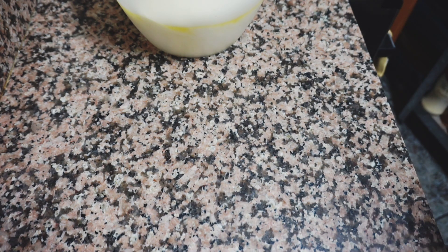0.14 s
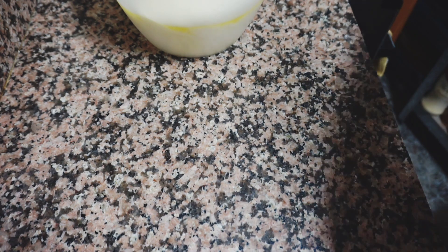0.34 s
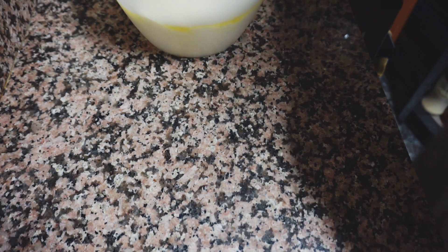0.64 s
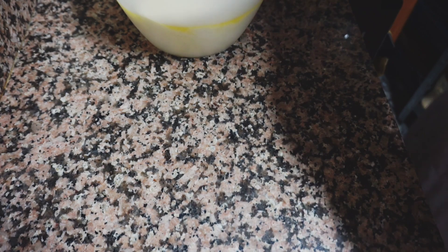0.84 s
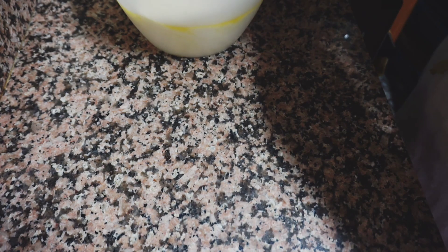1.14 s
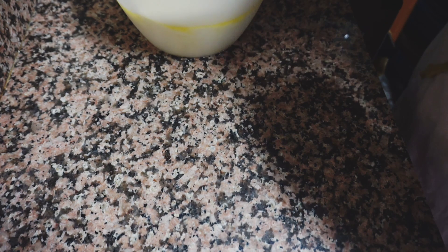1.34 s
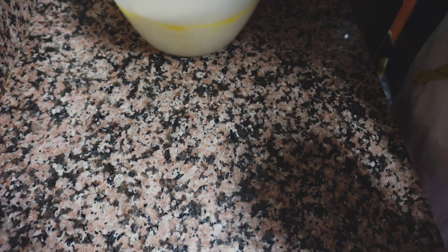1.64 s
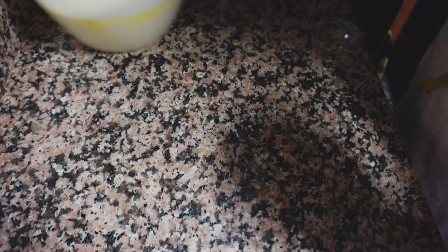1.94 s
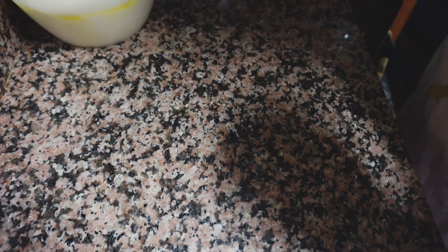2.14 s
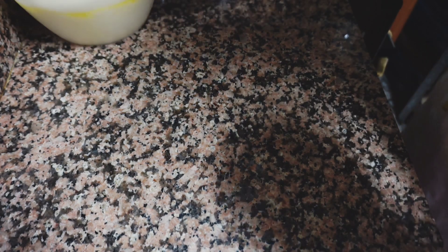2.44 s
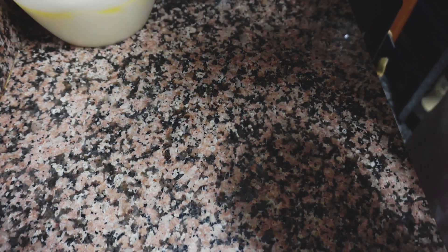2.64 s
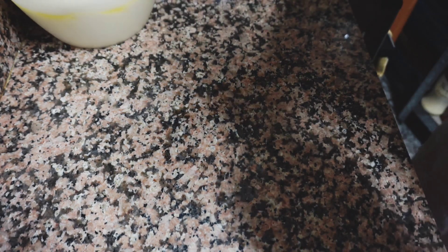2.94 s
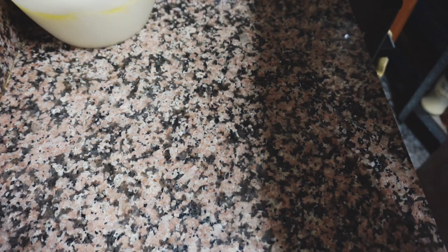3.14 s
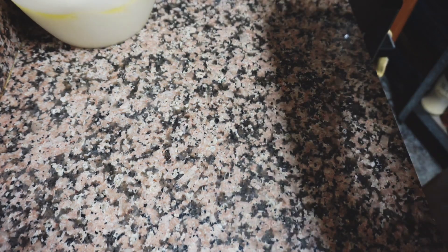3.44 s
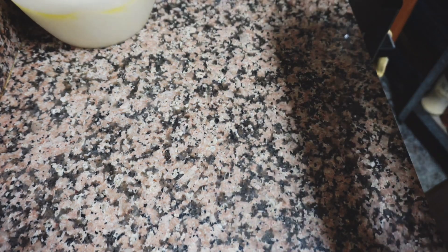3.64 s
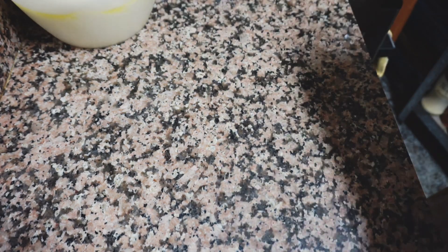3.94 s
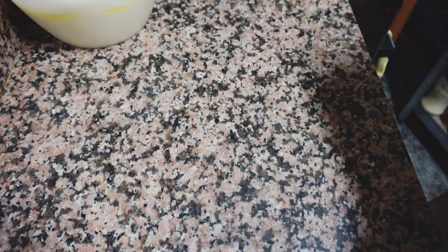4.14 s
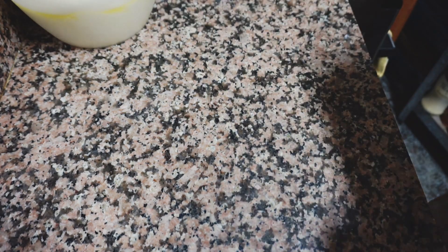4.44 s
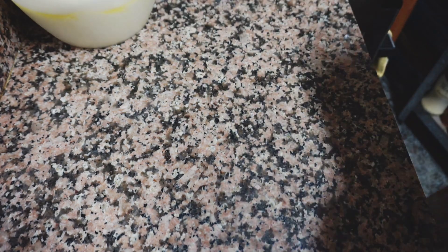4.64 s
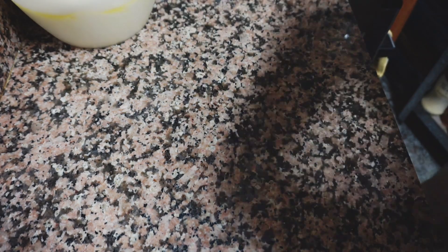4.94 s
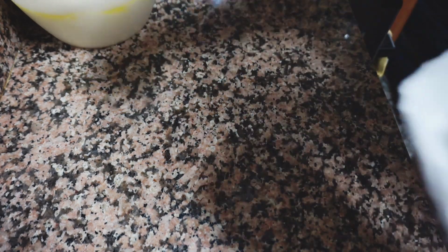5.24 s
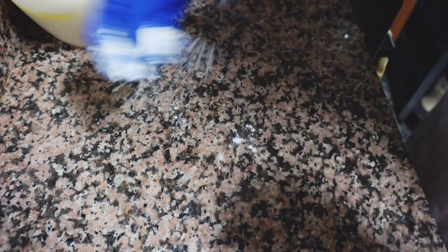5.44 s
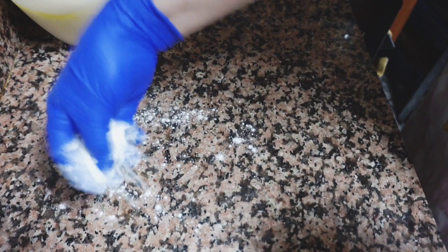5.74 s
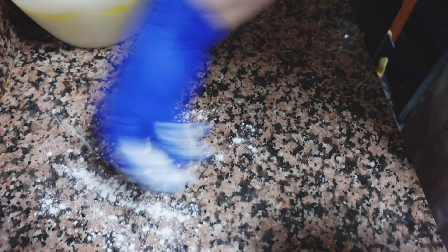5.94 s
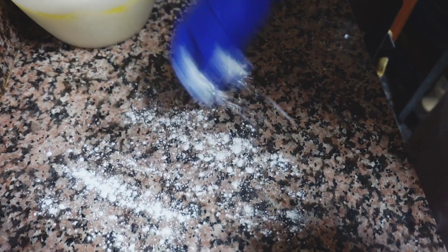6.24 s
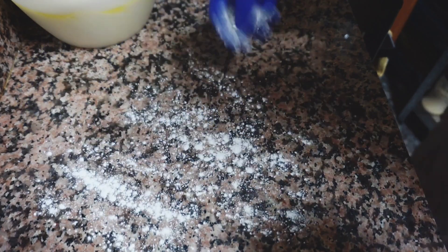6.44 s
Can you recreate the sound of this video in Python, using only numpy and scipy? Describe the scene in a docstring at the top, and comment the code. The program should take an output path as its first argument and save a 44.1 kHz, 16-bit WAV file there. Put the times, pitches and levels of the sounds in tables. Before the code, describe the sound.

Close pickup in a small kitchen with near reflections and a short dull tail. From 0 to about 1.3 seconds a gloved hand digs in a paper bag, slightly right: dry hisses, coarse crumpling and many irregular hollow pops and cracks, densest and loudest around 0.7 to 0.85, with dull flour bumps and short rubber squeaks. The rustle thins out by 1.6. From 1.6 to 2.15 a plastic bowl, slightly left, grates and catches on stone, ending in one hard, hollow clattering knock at 2.15, the sharpest event. A light rim scrape follows at 2.4 to 2.65, then near silence. From 3.0 to 5.05 the paper rustles again, busiest at 3.2 to 4.0, sparser later. Afterwards come quiet air, faint distant ticks about every quarter second, and tiny soft flour pats at 5.8 to 5.9. A very faint high whine runs throughout.

```python
"""Paper hisses, crumples and buckles as a gloved hand digs flour out of a paper bag in a small kitchen.
Between two dips a plastic bowl slides over stone, is knocked and nudged; soft pats of flour end the scene.
Faint ticks sound across the room, over quiet air and a very faint high whine.
Friction and creasing are random trains of tiny slips, the bowl is a sum of damped modes,
and ticks, puffs and air are shaped noise; reflections and a short tail place them in the room."""
import sys
import numpy as np
from scipy import signal
from scipy.fft import rfft, irfft
from scipy.io import wavfile
from scipy.ndimage import uniform_filter1d

SR = 44100
rng = np.random.default_rng(int(sys.argv[2]) if len(sys.argv) > 2 else 0)


def pcm_store(signal):
    """Save signal as 16-bit PCM."""
    levels = np.round(np.clip(np.atleast_2d(signal), -1, 1) * 32767)
    wavfile.write(sys.argv[1], SR, levels.astype(np.int16).T)


N = 290178
TIME = np.arange(N) / SR

# All levels are relative to the layer's own gain.
# strokes of the glove along the paper: (time of full speed [s], swell [s], hold [s],
# hiss level [dB], crumpling relative to the hiss [dB])
STROKES = [(0.0, .02, 0.0053, -38.5, 13.5), (0.22, 0.064, 0.0042, -43, -1.5),
           (0.263, 0.028, 0.051, -43, -3.5), (0.497, 0.058, 0.011, -35, 3), (0.548, 0.051, 0.023, -42.5, 8),
           (0.637, 0.088, 0.011, -38, -22), (0.705, 0.02, 0.03, -37.5, 9.5), (0.962, 0.073, .03, -42.5, 3),
           (1.173, 0.066, 0.018, -34, -2), (1.236, 0.17, 0.087, -42, 2), (1.629, 0.014, .02, -49.5, -8),
           (2.944, 0.19, 0.0043, -60, -17), (3.071, 0.0027, 0.05, -44, -13.5),
           (3.229, 0.071, 0.027, -35, -0.5), (3.434, 0.066, 0.02, -41, 2), (3.514, 0.045, 0.009, -33, 5.5),
           (3.628, 0.093, 0.0033, -37, 5.5), (3.655, 0.032, 0.049, -38, -6),
           (3.753, 0.051, 0.076, -36.5, 2.5), (3.823, .06, 0.15, -34, -6), (4.011, 0.086, 0.012, -39, 5),
           (4.233, 0.137, 0.0091, -45.5, 4), (4.308, 0.15, 0.081, -47, 1),
           (4.505, 0.066, 0.048, -41.5, -0.5), (4.662, 0.045, 0.044, -44, -13), (4.733, 0.048, .1, -39, -7),
           (4.841, 0.16, 0.205, -36, -9.5)]
# the hand squeezes the bag and bends its walls: (time of full force [s], swell [s], hold [s], level [dB])
SQUEEZES = [(0.0, .01, 0.042, -32.5), (0.062, 0.033, .015, -36.5), (0.687, 0.045, 0.15, -29.5),
            (1.06, 0.035, 0.066, -27), (3.942, .06, 0.0088, -38), (4.468, .02, 0.025, -40.5),
            (5.005, 0.018, 0.034, -42)]
# light contact while the hand is inside the bag: (start [s], end [s], hiss level [dB])
DIPS = [(0.166, 1.325, -51), (3.091, 5.0, -52.5)]
# paper buckling: (time [s], flap level [dB], panel pitch [Hz], crack level [dB])
BUCKLES = [(0.009, -19.5, 1460, -38), (0.0511, -21, 1456, -22), (0.1011, -30, 558, -57),
           (0.2413, -24.5, 1000, -29), (0.313, -31.5, 1100, -22.5), (0.4916, -20, 1200, -25.5),
           (0.5435, -21, 1400, -30.5), (0.5541, -17.5, 1487, -24.5), (0.688, -15.5, 910, -23),
           (0.7088, -19.5, 890, -20.5), (0.7255, -21.5, 1200, -26), (0.7375, -17.5, 650, -15),
           (0.7621, -16.5, 950, -45.5), (0.7725, -21, 760, -36), (0.7841, -19, 830, -19),
           (0.8225, -21.5, 1100, -15), (0.8296, -11, 912, -19.5), (0.9345, -23.5, 794, -22),
           (1.0046, -20, 1160, -22), (1.0595, -24.5, 1300, -20.5), (1.0695, -17.5, 1004, -25),
           (1.0948, -14, 1430, -35), (1.1259, -18, 865, -28), (1.1815, -24.5, 1200, -20.5),
           (1.2607, -19, 1053, -52.5), (3.027, -48, 650, -55), (3.0739, -33, 670, -36),
           (3.1642, -27.5, 532, -23), (3.2155, -20.5, 680, -28), (3.2315, -19, 700, -27),
           (3.2623, -25, 538, -19.5), (3.4833, -20.5, 717, -29), (3.5078, -16, 936, -23),
           (3.5235, -18.5, 1000, -32), (3.5845, -26.5, 900, -26.5), (3.7213, -25, 1114, -26.5),
           (3.7455, -19.5, 752, -26.5), (3.7586, -22.5, 1100, -26.5), (3.7768, -32.5, 1000, -32.5),
           (3.7875, -15, 975, -35), (3.9437, -19, 823, -20), (4.0052, -18, 1183, -21.5),
           (4.1272, -27.5, 1000, -32), (4.2538, -23.5, 1037, -29.5), (4.2727, -27, 730, -37.5),
           (4.5342, -25.5, 1360, -23.5), (4.7957, -24.5, 1540, -21.5), (4.802, -18, 1170, -21),
           (4.928, -28, 1347, -30), (5.047, -25, 793, -28.5)]
# flour shifting in the bag: (time [s], level [dB])
THUDS = [(0.722, -44.5), (0.88, -38), (1.094, -26.5), (1.125, -31.5), (3.222, -41), (3.61, -34)]
# glove skidding on the paper: (time [s], level [dB], centre [Hz], length [s])
SQUEAKS = [(0.275, -44, 12000, 0.018), (0.539, -37.5, 12800, 0.005), (0.615, -36, 11500, 0.011),
           (0.981, -45, 3970, 0.05), (1.208, -38, 13000, 0.06), (1.301, -34.5, 4050, 0.005),
           (1.351, -36.5, 3100, 0.014), (3.629, -28, 7160, 0.012), (3.764, -37, 11900, 0.006),
           (4.871, -38, 4410, 0.13)]
# bowl pushed over the stone: (time [s], level [dB])
PUSH = [(1.58, -62.5), (1.66, -51), (1.8, -40), (1.89, -42), (2.03, -45.5), (2.15, -51.5)]
# bowl nudged on its rim: (time [s], level [dB])
NUDGE = [(2.36, -63), (2.51, -37.5), (2.585, -38), (2.68, -59)]
# the rim touches the stone: (time [s], level [dB])
RIM_CONTACT = [(2.37, -68), (2.43, -51.5), (2.52, -46.5), (2.605, -44.5), (2.65, -68)]
# the bowl's foot catching and letting go: (time [s], level [dB])
CATCHES = [(1.699, -33), (1.819, -35), (1.866, -25.5), (1.885, -28.5), (1.903, -31), (1.952, -30),
           (2.045, -27), (2.578, -36)]
# contacts of one clattering knock on the bowl: (time [s], level [dB])
KNOCK = [(2.145, -14.5), (2.1464, -14.5), (2.1476, -10.5)]
# soft pats of falling flour: (time [s], level [dB])
PATS = [(5.817, -39), (5.845, -53), (5.875, -45), (5.9, -41.5)]
# distant ticking: (time [s], level [dB])
TICKS = [(1.524, -51), (2.06, -54.5), (2.326, -61.5), (2.83, -60), (5.253, -55.5), (5.521, -62),
         (5.79, -62.5), (6.061, -62.5), (6.324, -60)]
# room tone, swelling a little while the flour falls: (time [s], level [dB])
AIR = [(0, -56.5), (2.3, -64.5), (2.75, -67), (5.2, -65), (5.7, -68.5), (5.95, -64.5), (6.58, -69)]

# bowl modes, further weighted by their width: (frequency [Hz], width [Hz], level [dB])
BOWL_MODES = [(350, 27, 4.5), (520, 22.5, 10), (655, 60, 6.5), (777, 56, -4), (833, 38, 7),
              (1620, 140, -23), (1930, 220, -12), (2025, 100, -7), (2660, 290, -22.5), (2840, 140, -27),
              (3550, 300, -36)]
# rim resonances under a light scrape: (frequency [Hz], width [Hz], level [dB])
RIM_MODES = [(2190, 130, -3), (2680, 91, 6), (3450, 100, 10), (3920, 110, -2.5), (4900, 100, -5)]
# spectral shapes of friction, creases, cracks, bowl contacts, ticks and air: (frequency [Hz], level [dB])
RUB_COLOUR = [(60, -41), (130, -19), (300, -19.5), (550, 2), (900, -3.5), (1700, -1), (2500, -2),
              (6600, -6), (13000, -6), (15800, -12.5)]
BEND_COLOUR = [(80, -33.5), (240, -8.5), (420, -5.5), (900, 6.5), (1450, -0.5), (2300, 2), (4700, -22.5),
               (6000, -16.5), (15000, -44.5)]
CRACK_COLOUR = [(200, -28.5), (800, 3.5), (1600, 8), (4400, -1), (6000, -6.5), (15000, -15.5)]
PUSH_COLOUR = [(110, -43.5), (250, -9.5), (440, -7), (580, 5.5), (840, 4.5), (1030, -10.5), (2100, -3.5),
               (3000, -16.5), (15000, -30)]
NUDGE_COLOUR = [(60, -31), (160, -10.5), (540, 7.5), (1400, -3), (2250, 8), (3500, -5), (5200, -13.5),
                (12000, -38.5)]
KNOCK_COLOUR = [(60, -26.5), (250, 5.5), (700, 14.5), (1300, 4.5), (2300, 13.5), (3600, 3.5), (6000, -5),
                (15000, -17)]
TICK_COLOUR = [(800, -7.5), (2000, 1.5), (3000, -1), (4400, 7), (6500, -1.5), (10000, -5), (15000, -15)]
ROOM_COLOUR = [(30, -34), (100, -13), (200, -6), (350, -4), (520, 3), (1000, -2.5), (1380, 0.5), (1950, -6),
               (2500, -3), (3200, -11), (15000, -16)]
# stereo width, side relative to mid: (frequency [Hz], level [dB])
BAG_WIDTH = [(130, -23), (380, -13), (700, -9.5), (1300, 0.5), (4400, 1.5), (8000, -1.5), (13000, -7)]
BOWL_WIDTH = [(170, -25), (500, -9), (1500, -6.5), (6000, -4), (15000, -3)]
AIR_WIDTH = [(150, -10), (1300, 1), (15000, -5.5)]

SWELL_DB = 13.5  # gained over the swell time of a stroke or squeeze
STROKE_RELEASE_DB_PER_S, SQUEEZE_RELEASE_DB_PER_S = 421, 342
CONTACT_SWELL_S, CONTACT_CRUMPLE_DB = 0.031, 3
SCRAPE_PER_CRUMPLE = 0.4  # dB of coarse scrape for each dB of crumpling
TENSE_S, TENSE_DB = 0.012, -6  # the paper tenses and goes quieter just before it buckles
WHINE_HZ, WHINE_DB = 15622, -75.5
TOP_HZ = 15850


def hand():
    """Dominant excitation: the strongest movement sets how hard paper is rubbed, crumpled and squeezed."""
    rub, crumple, squeeze = np.zeros((3, N))
    contact = [(start, CONTACT_SWELL_S, end - start, db, CONTACT_CRUMPLE_DB) for start, end, db in DIPS]
    for s, swell_s, hold_s, db, crumple_db in STROKES + contact:
        stroke = gesture(s, swell_s, hold_s, db, STROKE_RELEASE_DB_PER_S)
        rub = np.maximum(rub, stroke)
        crumple = np.maximum(crumple, stroke * amp(crumple_db))
    for row in SQUEEZES:
        squeeze = np.maximum(squeeze, gesture(*row, SQUEEZE_RELEASE_DB_PER_S))
    held = tension()
    return rub, crumple * held, squeeze * held


def gesture(s, swell_s, hold_s, db, release_db_per_s):
    """Exponential envelope: one hand movement swells, holds and dies away linearly in decibels."""
    early = np.maximum(s - TIME, 0)
    late = np.maximum(TIME - s - hold_s, 0)
    drop_db = SWELL_DB * early / max(swell_s, .002) + release_db_per_s * late
    return amp(db - np.minimum(drop_db, 200))


def tension():
    """Storage and release of strain: the gain sinks just before each buckle and is let go as it snaps."""
    db = np.zeros(N)
    for s, *_ in BUCKLES:
        sink = TENSE_DB * np.exp(-np.abs(s - TIME) / TENSE_S) * (TIME < s)
        db = np.minimum(db, sink)
    return amp(db)


def paper_rub(rub, crumple, squeeze, fine_db=-3.5, coarse_db=-5.5, squeezed_db=-14):
    """Dry friction: countless fibre slips make a fine hiss; pressing harder adds coarser, lower grains."""
    fine = through(grains(rate=9000, spread_db=3.0), snap(RUB_COLOUR))
    fine = through(fine, snap([(2500, -13.5), (6500, -2.5)])) * grip(rate=60, depth_db=4.0)
    fine = band_unit(fine, 6000, 15000)
    coarse = through(grains(rate=1500, spread_db=1.0), snap(RUB_COLOUR))
    coarse = through(coarse, snap([(4800, 8.0), (9000, -19)])) * grip(rate=81, depth_db=4.0)
    coarse = band_unit(coarse, 2500, 5500)
    stroked = amp(coarse_db) * rub * (crumple / rub) ** SCRAPE_PER_CRUMPLE
    scrape = np.hypot(stroked, amp(squeezed_db) * squeeze)
    return amp(fine_db) * rub * fine + scrape * coarse


def paper_bend(force, bend_db=-6.5):
    """Crackling noise: small creases give way in uneven clusters and sound the hollow bag."""
    creases = grains(rate=450, spread_db=4.0) * grip(rate=110, depth_db=7)
    crumple = band_unit(through(creases, snap(BEND_COLOUR)), 300, 2000)
    return crumple * amp(bend_db) * force


def paper_buckles(flap_db=1, decay_cycles=2.71, crack_db=-2, crack_s=0.0054, needle_db=2,
                  hollow_db=-17, hollow_s=0.018):
    """Snap-through: a crease cracks, its panel flips at its own pitch and the bag's hollow answers."""
    out, t = np.zeros(N), TIME[:SR // 16]
    needle = snap(CRACK_COLOUR)
    needle = amp(needle_db) * needle / np.abs(needle).max()
    for s, db, hz, sharp_db in BUCKLES:
        flap = np.sin(2 * np.pi * hz * t) * np.exp(-hz * t / decay_cycles)
        hollow = np.zeros(len(t))
        for f in (420.4, 537, 797, 900, 1155, 1492):  # cavity resonances, excited by chance
            hollow += np.sin(2 * np.pi * f * t) * rng.standard_normal() / 2 * min(f / 800, 1)
        hollow *= amp(hollow_db) * np.exp(-t / hollow_s)
        crack = amp(sharp_db + crack_db)
        add(out, s, amp(db + flap_db) * (flap + hollow) + crack * burst(CRACK_COLOUR, crack_s))
        add(out, s, crack * needle)
    # a thin sheet radiates almost no bass
    return signal.sosfilt(signal.butter(4, 230, "high", fs=SR, output="sos"), out)


def bag_thuds(thud_db=0, fade_s=0.024):
    """Damped impact: packed flour shifts in the bag with a dull bump."""
    colour = [(40, -30.5), (90, -51), (260, -7), (480, 1), (800, -3), (2000, -42.0)]
    return amp(thud_db) * through(blows(THUDS), burst(colour, fade_s))


def glove_squeaks(sharpness=3):
    """Stick-slip friction: rubber skids over the paper in a rough band, under a bell-shaped envelope."""
    out = np.zeros(N)
    slips = grains(rate=7500, spread_db=0.5)
    for s, db, hz, length in SQUEAKS:
        band = signal.iirpeak(hz, sharpness, SR)
        skid = unit(signal.lfilter(*band, signal.lfilter(*band, slips)))
        out += skid * amp(db) * np.exp(-((TIME - s) / (length / 2)) ** 2)
    return out


def bowl_slides(push_ring_db=-3, push_grit_db=1.5, nudge_grit_db=-2):
    """Stick-slip of foot on stone excites the bowl's modes; the lightly touched rim sings unevenly."""
    push_ring = unit(through(grains(rate=400, spread_db=1.5), bowl_ring()))
    lumps = grains(rate=3000, spread_db=2) * grip(rate=70, depth_db=4.5)
    push_grit = unit(through(lumps, snap(PUSH_COLOUR)))
    push = amp(push_ring_db) * push_ring + amp(push_grit_db) * push_grit
    slips = grains(rate=3000, spread_db=3.0)
    rim = np.zeros(N)
    for hz, width, db in RIM_MODES:  # each resonance comes and goes by itself
        rim += amp(db) * signal.lfilter(*signal.iirpeak(hz, hz / width, SR), slips * grip(rate=31, depth_db=3.5))
    rim = unit(rim) * swell(RIM_CONTACT)
    nudge = amp(nudge_grit_db) * unit(through(slips, snap(NUDGE_COLOUR)))
    catches = through(blows(CATCHES), bowl_ring(tilt_db=0.5))
    return push * swell(PUSH) + nudge * swell(NUDGE) + rim + catches


def bowl_knock(click_db=0, ring_db=-10, rattle_db=-27, rattle_s=0.019):
    """Repeated impact: three contacts within milliseconds, the last hardest, click, ring and rattle."""
    hits = blows(KNOCK)
    click = through(snap(KNOCK_COLOUR), snap([(3000, -1.5), (6500, -4)]))
    out = amp(click_db) * through(hits, click / np.abs(click).max())
    out += amp(ring_db) * through(hits, bowl_ring(tilt_db=21))
    add(out, KNOCK[0][0], amp(rattle_db) * burst(KNOCK_COLOUR, rattle_s))
    return out


def bowl_ring(tilt_db=0):
    """Modal superposition: answer to one blow, peak 1; harder contact tilts it up, in dB an octave."""
    t = TIME[:SR // 5]
    ring = np.zeros(len(t))
    for k, (hz, width, db) in enumerate(BOWL_MODES):
        mode = width * np.exp(-np.pi * width * t) * np.sin(2 * np.pi * hz * t)
        ring += amp(db + tilt_db * np.log2(hz)) * mode * (-1) ** k
    # nothing radiates far below the lowest mode
    ring = signal.sosfilt(signal.butter(2, 260, "high", fs=SR, output="sos"), ring)
    return ring / np.abs(ring).max()


def flour_pats(ring_hz=538, ring_db=-9, puff_db=-15):
    """Soft impact: dull puffs with a small hollow ring of gradual onset."""
    t = TIME[:SR // 16]
    ring = np.sin(2 * np.pi * ring_hz * t) * (1 - np.exp(-t / .002)) * np.exp(-t / .016)
    puff = burst([(100, -43), (500, -0.5), (2200, -4.5), (4500, -41)], fade_s=0.013)
    return through(blows(PATS), amp(ring_db) * ring + amp(puff_db) * puff)


def ticking(fade_s=0.035, tick_db=2):
    """Exponentially decaying noise: thin, raspy ticks that fade quickly."""
    fades = through(blows(TICKS), np.exp(-TIME[:SR // 4] / fade_s))
    return amp(tick_db) * through(fades * rng.standard_normal(N), snap(TICK_COLOUR))


def room_tone():
    """Stationary coloured noise under a slow gain is quiet air; a pure tone is a faint electronic whine."""
    mid, side = (unit(through(rng.standard_normal(N), snap(ROOM_COLOUR, size=4096))) for _ in range(2))
    side = irfft(rfft(side) * gains(AIR_WIDTH, N), N)
    whine = amp(WHINE_DB) * unit(np.sin(2 * np.pi * WHINE_HZ * TIME))
    level = amp(np.interp(TIME, *np.transpose(AIR)))
    return np.array([mid + side, mid - side]) * level + whine


def kitchen(x, width, pan_db, near_db, tail_db, lead=1, near_t60=0.092, tail_t60=0.3):
    """Room acoustics: direct sound, sparse near reflections and a short dull tail, in two channels."""
    t = TIME[:SR // 2]
    heard = []
    for _ in range(2):
        near = rng.standard_normal(len(t)) * (rng.random(len(t)) < .1)
        near = near * amp(-60 * t / near_t60) * (t > .001)
        tail = rng.standard_normal(len(t)) * amp(-60 * t / tail_t60) * (t > .008)
        tail = through(tail / np.linalg.norm(tail), snap([(2500, -1.0), (15000, -9.0)]))
        room = amp(near_db) * near / np.linalg.norm(near) + amp(tail_db) * tail
        heard.append(through(x, room))
    mid = x + heard[0]
    # side: independent reflections plus direct sound a quarter cycle apart, its sign set by lead
    apart = np.std(mid) * (rfft(unit(heard[1])) - 1j * lead * rfft(unit(x))) / np.sqrt(2)
    side = irfft(apart * gains(width, N), N)
    pair = np.array([(mid + side) * amp(pan_db / 2), (mid - side) * amp(-pan_db / 2)])  # left, right
    return pair / np.sqrt(1 + amp(near_db) ** 2 + amp(tail_db) ** 2)


def grains(rate, spread_db):
    """Shot noise: random tiny slips, so many a second, a few much larger than the rest; rms 1."""
    chance, size, sign = rng.random(N), rng.exponential(size=N), rng.choice([-1, 1], N)
    return unit((chance < rate / SR) * sign * amp(spread_db * np.minimum(size, 4)))


def grip(rate, depth_db):
    """Random modulation: uneven catch and slip, a gain that jumps about so many times a second."""
    step = np.cumsum(rng.random(N) < rate / SR)
    return amp(depth_db * uniform_filter1d(rng.uniform(-1.14, 1, N)[step], size=64))


def burst(colour, fade_s):
    """Transient noise: a short rush with a rounded attack and exponential decay."""
    t = TIME[:SR // 16]
    rush = rng.standard_normal(len(t)) * (1 - np.exp(-t / .001)) * np.exp(-t / fade_s)
    return through(rush, snap(colour))


def blows(rows):
    """Impulsive excitation: one impulse for each (time [s], level [dB]) row."""
    out = np.zeros(N)
    for s, db in rows:
        add(out, s, amp([db]))
    return out


def swell(rows):
    """Amplitude envelope: gain along (time [s], level [dB]) rows, silent outside them."""
    s, db = np.transpose(rows)
    return amp(np.interp(TIME, s, db)) * (TIME >= s[0]) * (TIME <= s[-1])


def snap(points, size=1024):
    """Minimum phase: the causal click of unit energy with a given spectral shape."""
    cepstrum = irfft(np.log(gains(points, size)))
    cepstrum[1:size // 2] *= 2  # folding the cepstrum makes the click causal
    cepstrum[size // 2 + 1:] = 0
    click = irfft(np.exp(rfft(cepstrum)))
    return click / np.linalg.norm(click)


def gains(points, size):
    """Spectral envelope: (frequency [Hz], level [dB]) points as a gain at each transform bin."""
    hz, db = np.transpose(points)
    return amp(np.interp(np.log(np.fft.rfftfreq(size, 1 / SR) + 1), np.log(hz), db))


def through(x, response):
    """Convolution: pass a sound through an impulse response."""
    return signal.fftconvolve(x, response)[:len(x)]


def band_unit(x, lo, hi):
    """Band level: scale the whole sound so that one band has rms 1."""
    band = signal.sosfilt(signal.butter(4, [lo, hi], "band", fs=SR, output="sos"), x)
    return x / np.std(band)


def unit(x):
    """Effective value: scale to rms 1."""
    return x / np.sqrt(np.mean(x ** 2))


def amp(db):
    """Logarithmic level: decibels to gain."""
    return 10 ** (np.asarray(db) / 20)


def add(out, s, x):
    """Superposition: mix a short sound in at a time in seconds."""
    i = max(int(s * SR), 0)
    out[i:i + len(x)] += x[:N - i]


def scene():
    """Superposition of sources: bag to the right, bowl slightly left, ticking far away, air around."""
    rub, crumple, squeeze = hand()
    force = np.hypot(crumple, squeeze)
    # the hand rubs both walls of the bag, and each is heard by its own paths
    front = paper_rub(rub, crumple, squeeze) + paper_bend(force) + bag_thuds()
    back = paper_rub(rub, crumple, squeeze) + paper_bend(force) + glove_squeaks()
    bag = kitchen(front, BAG_WIDTH, pan_db=-1.5, near_db=-6, tail_db=-14.0, lead=1)
    bag += kitchen(back, BAG_WIDTH, pan_db=-1.5, near_db=-6, tail_db=-14.0, lead=-1)
    # the outer panels buckle in the open and are heard more directly
    bag += kitchen(paper_buckles(), BAG_WIDTH, pan_db=-3.0, near_db=-8, tail_db=-14)
    bowl_and_flour = bowl_slides() + bowl_knock() + flour_pats()
    bowl = kitchen(bowl_and_flour, BOWL_WIDTH, pan_db=1.0, near_db=-8.5, tail_db=-17.5)
    far = kitchen(ticking(), AIR_WIDTH, pan_db=-1.0, near_db=-4.5, tail_db=-15.0)
    return bag + bowl + far + room_tone()


def record(dry):
    """Band limiting: a steep elliptic low-pass cuts the very top."""
    return signal.sosfilt(signal.ellip(10, .2, 70, TOP_HZ, fs=SR, output="sos"), dry)


dry = scene()
out = record(dry)
pcm_store(out)
```